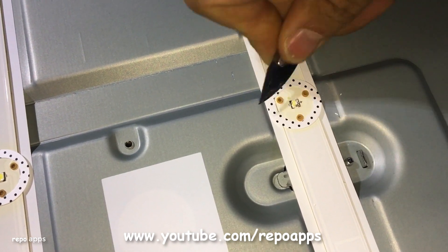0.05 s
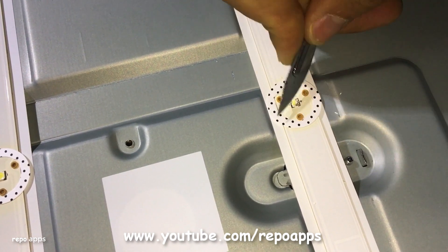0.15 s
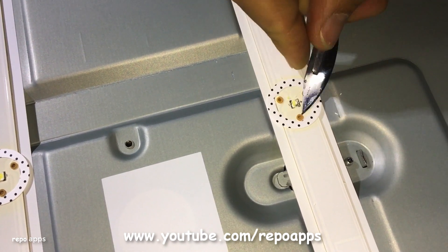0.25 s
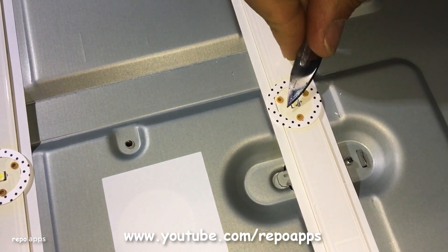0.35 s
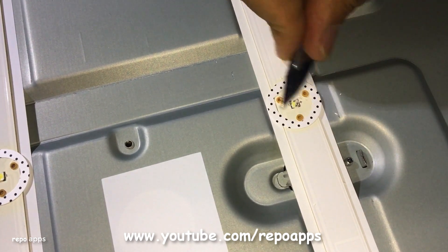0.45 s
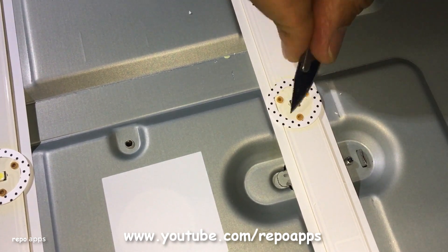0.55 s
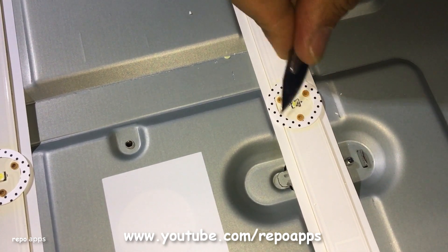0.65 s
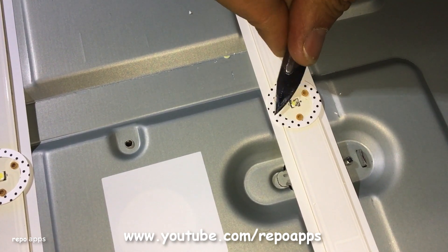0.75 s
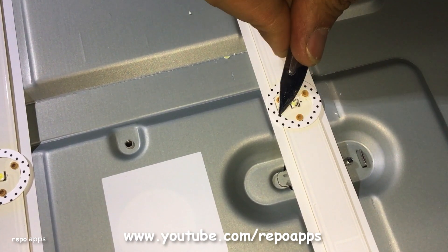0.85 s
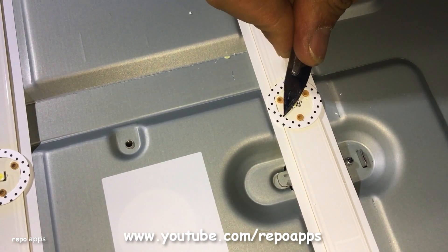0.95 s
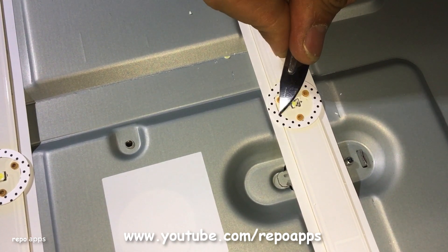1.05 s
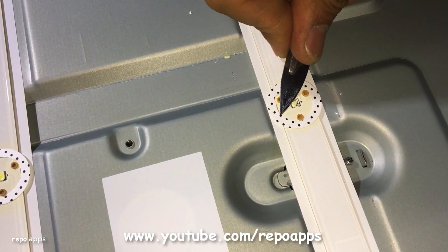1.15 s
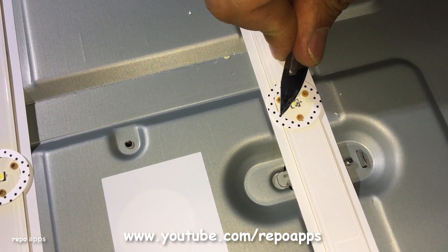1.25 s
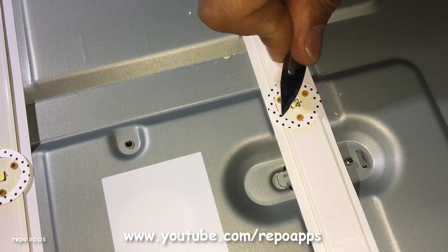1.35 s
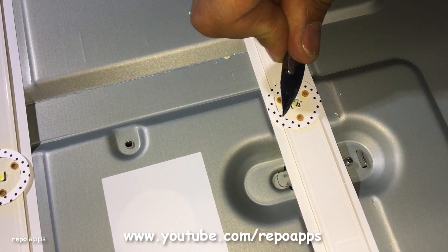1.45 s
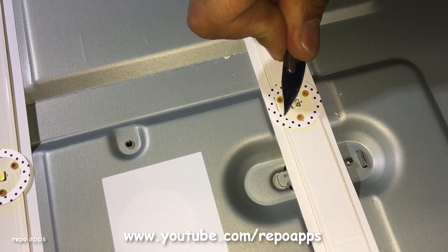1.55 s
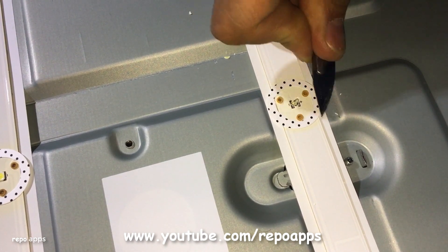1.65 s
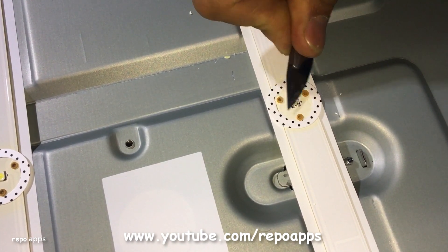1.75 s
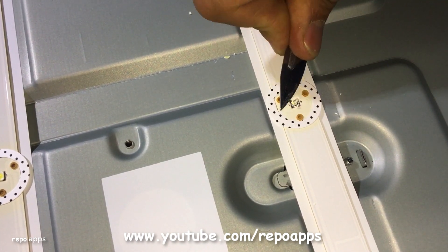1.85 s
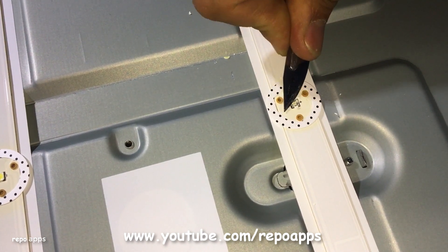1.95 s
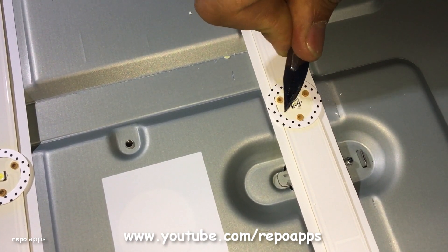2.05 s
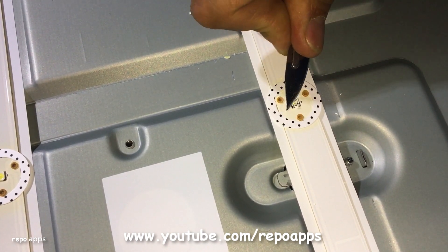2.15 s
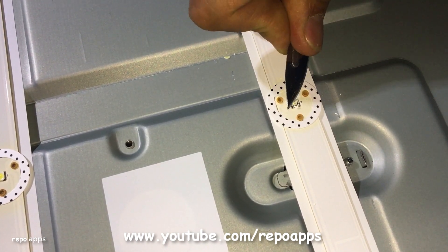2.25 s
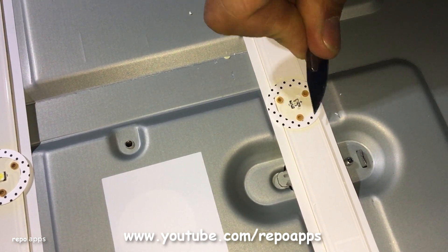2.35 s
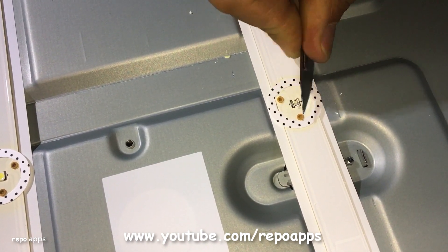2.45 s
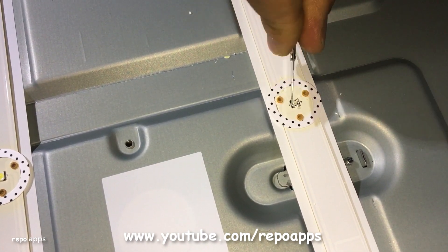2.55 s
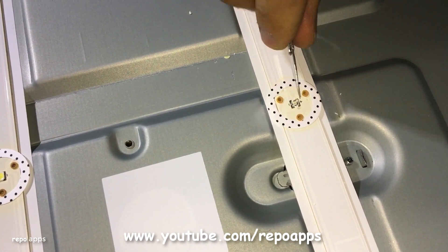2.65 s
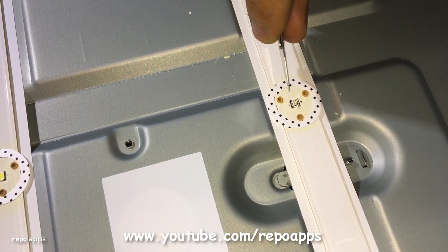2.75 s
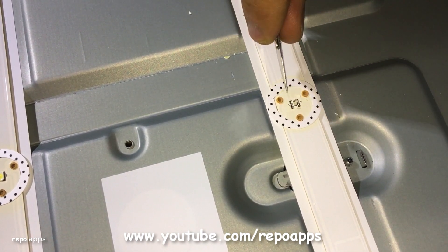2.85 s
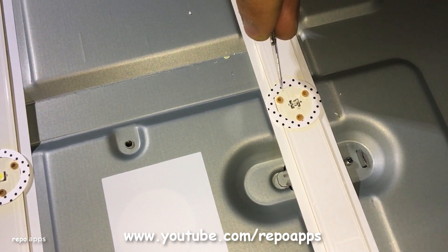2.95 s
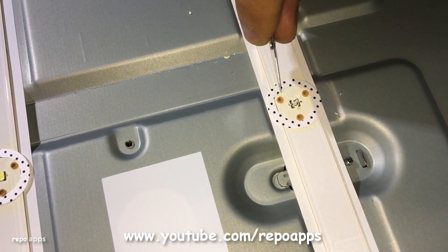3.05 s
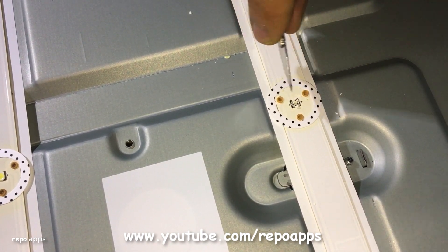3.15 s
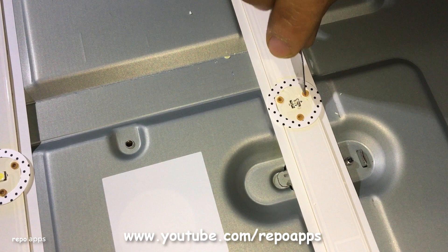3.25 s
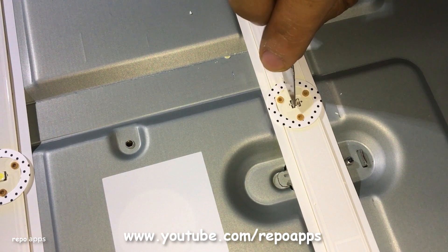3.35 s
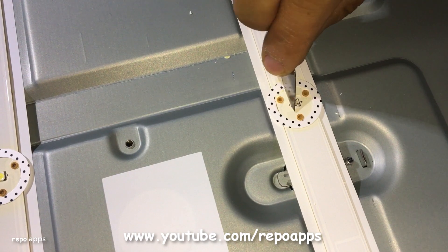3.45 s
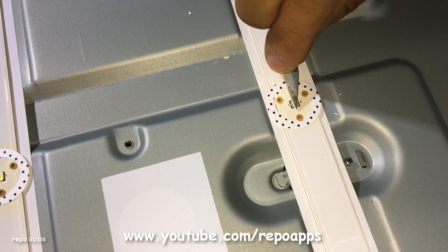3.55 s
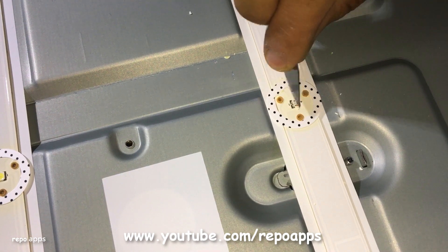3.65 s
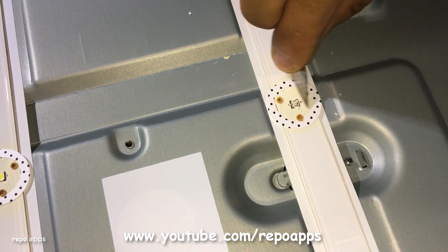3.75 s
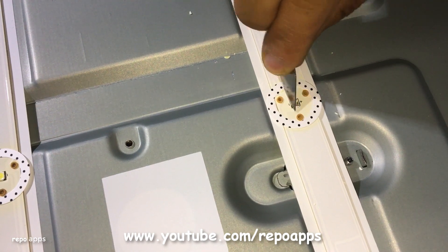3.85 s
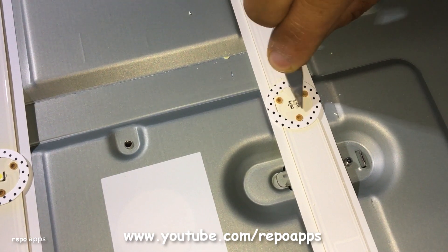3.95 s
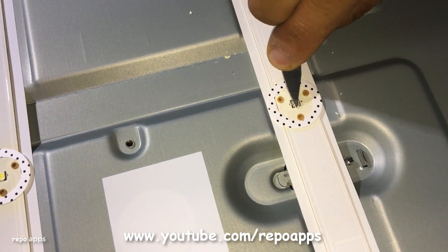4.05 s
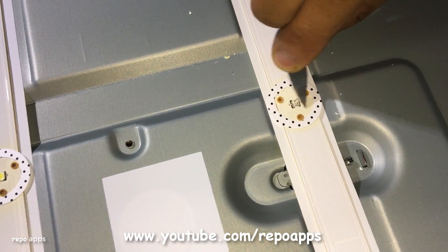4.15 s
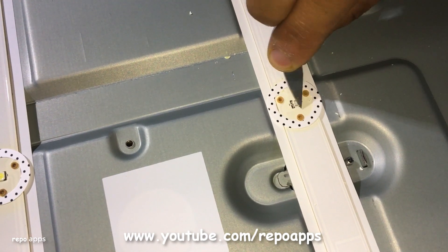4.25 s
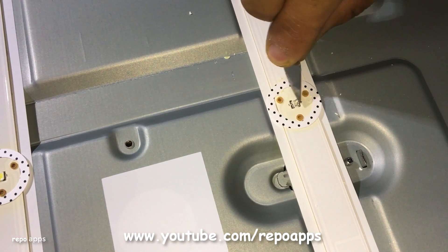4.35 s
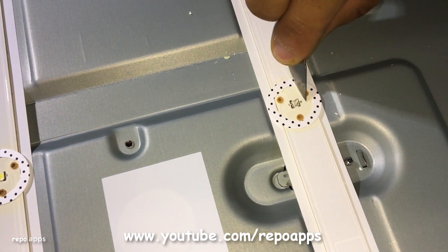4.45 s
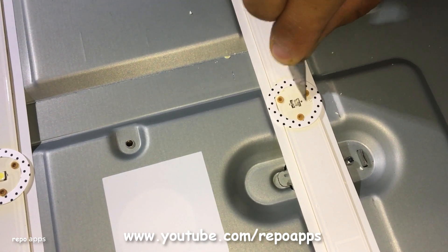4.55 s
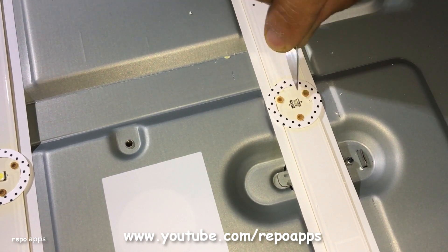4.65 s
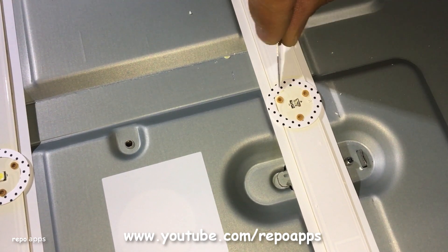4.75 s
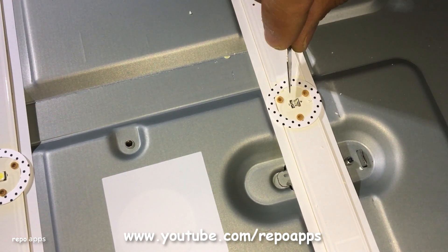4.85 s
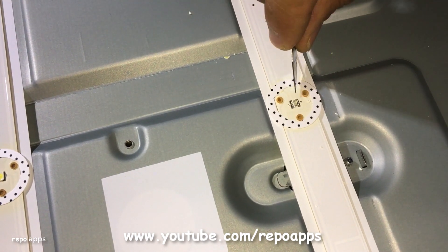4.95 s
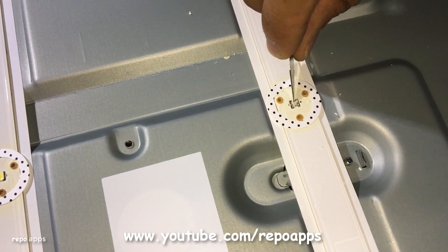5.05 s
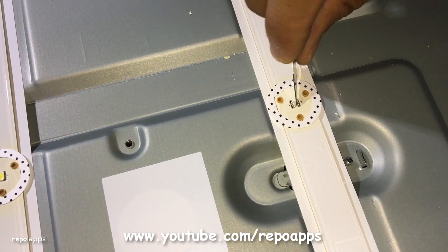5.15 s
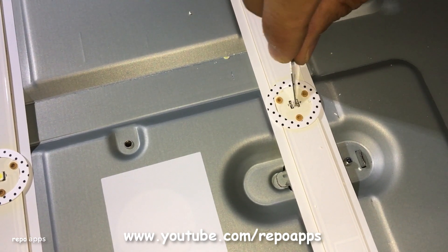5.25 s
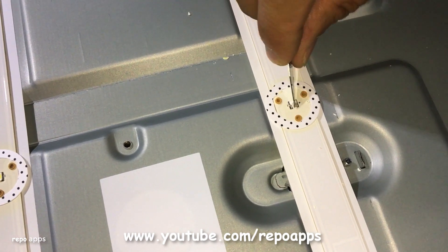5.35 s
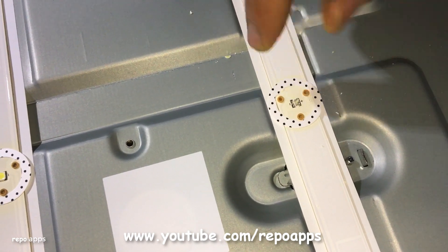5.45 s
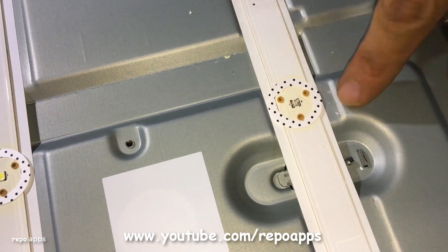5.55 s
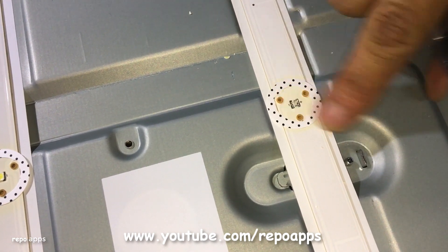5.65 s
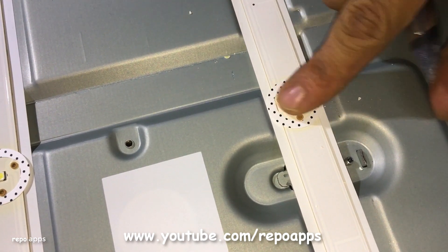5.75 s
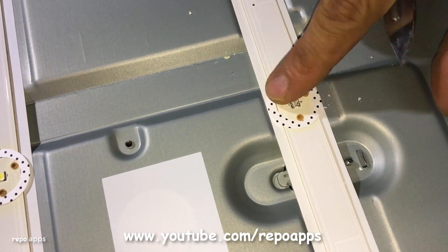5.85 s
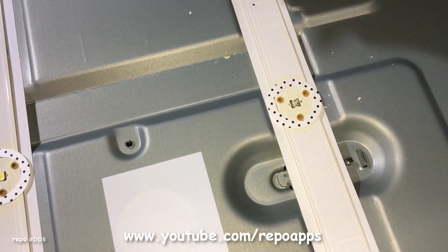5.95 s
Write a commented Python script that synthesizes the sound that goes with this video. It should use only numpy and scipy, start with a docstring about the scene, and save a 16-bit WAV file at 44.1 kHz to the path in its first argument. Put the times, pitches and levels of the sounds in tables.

```python
"""A small room, microphone close to a sheet-metal tray: steel tweezers pry at an LED on a strip fixed in it.
Each touch is a short burst of noisy slips sent through the resonances of tweezers and strip:
the tips tick and ring, the strip crunches, the tray knocks dully underneath and rings on as damped sines.
At the end a fingertip wipes the strip. Behind lie rumble and a faint hiss, shaped noise, the hiss
lifting in six spells; the hand rumbles on the tray, and the tray flexes in low tones."""
import sys
import numpy as np
from scipy import signal
from scipy.fft import rfft, irfft
from scipy.io import wavfile

SR = 44100
rng = np.random.default_rng(int(sys.argv[2]) if len(sys.argv) > 2 else 0)


def store_wav(level_fs):
    """Save 16-bit WAV to argv[1]."""
    pcm = np.round(np.clip(np.atleast_2d(level_fs), -1, 1) * 32767)
    wavfile.write(sys.argv[1], SR, pcm.T.astype(np.int16))


N = 264153
T = np.arange(N) / SR


def gain_of(db):
    """Decibels to amplitude."""
    return 10 ** (np.asarray(db) / 20)


def unit(x):
    """Scales to energy 1."""
    return x / np.sqrt(np.sum(x ** 2) + 1e-30)


def read(points, hz):
    """Joins (f/Hz, value) points on a log-frequency axis."""
    f, value = np.transpose(points)
    return np.interp(np.log(hz + 1), np.log(f + 1), value)


def add(mix, s, sound):
    """Lays a sound into the mix at a time in seconds."""
    part = mix[max(round(s * SR), 0):][:len(sound)]
    part += sound[:len(part)]


def band(x, lo_hz, hi_hz, order=3):
    """Causal band-pass."""
    return signal.sosfilt(signal.butter(order, [lo_hz, hi_hz], "band", fs=SR, output="sos"), x)


def causal(db, size=2048):
    """The most compact causal response (minimum phase) with this gain."""
    log_gain = np.r_[db, db[-2:0:-1]] * np.log(10) / 20
    spectrum = np.exp(np.conj(signal.hilbert(log_gain)))[:len(db)]
    return irfft(spectrum)[:size]


def noise(colour):
    """Steady noise of rms 1; only the shape of the colour counts."""
    shape = gain_of(read(colour, np.fft.rfftfreq(N, 1 / SR)))
    return unit(irfft(rfft(rng.standard_normal(N)) * shape, N)) * np.sqrt(N)


# colour of the steady rumble and hiss behind everything: (f/Hz, relative level/dB per Hz)
FLOOR_COLOUR = [(12, -56), (20, -15.5), (32, -7), (53, -2), (101, -6), (154, -20.5), (301, -28.5),
                (328, -30.5), (802, -30), (873, -29), (2820, -34), (5380, -37.5), (7110, -38.5),
                (13200, -43.5), (16000, -49.5)]


def room_floor(level_db=-65.5):
    """The room at rest: steady noise, strongest in the low rumble."""
    return gain_of(level_db) * noise(FLOOR_COLOUR)


# colour of the lifting hiss: (f/Hz, relative level/dB per Hz)
HISS_COLOUR = [(150, -35), (250, 1.5), (360, -5), (686, -10.5), (1400, -13), (2020, -11.5), (2810, -13.5),
               (3230, -14), (9490, -18.5), (14900, -28), (16000, -25.5)]
# spells in which the hiss lifts: (start t/s, end t/s, rms level/dB)
HISS_LIFTS = [(0.493, 0.748, -63), (1.654, 1.882, -65), (1.953, 2.177, -64), (2.354, 2.579, -64),
              (2.806, 2.947, -69), (3.805, 4.838, -65)]


def hiss_lifts(edge_s=0.0096):
    """Extra hiss, faded in and out of each spell within milliseconds."""
    lift = np.zeros(N)
    for start, end, db in HISS_LIFTS:
        lift += gain_of(db) * np.clip(np.minimum(T - start, end - T) / edge_s + .5, 0, 1)
    return lift * noise(HISS_COLOUR)


# the hand's weight shifts on the tray: (t/s, rumble level/dB before the trim)
HAND_WEIGHT = [(0, -63.5), (.25, -66.5), (.62, -62.5), (.97, -69.5), (1.58, -61), (2.3, -62.5), (3.14, -70),
               (3.65, -61.5), (4.35, -57), (4.62, -58), (5.15, -71.5), (5.4, -69), (5.7, -70), (5.95, -63)]


def hand_rumble(trim_db=-3):
    """The hand resting on the tray: low noise that swells and sinks as its weight shifts."""
    colour = [(20, -19.0), (45, -1), (90, -2.5), (200, -7.5), (450, -15.5), (1200, -31.0), (8000, -68.5)]
    level_db = np.interp(T, *np.transpose(HAND_WEIGHT)) + trim_db
    return gain_of(level_db) * noise(colour)


# the tray flexes under the hand or the tips: (t/s, length/s, first f/Hz, last f/Hz, peak level/dB)
TRAY_BUMPS = [(1.654, 0.045, 342, 342, -36.5), (3.329, 0.1, 128, 64, -48), (3.838, 0.06, 85, 55, -47),
              (3.919, 0.079, 55, 50.6, -43.5), (3.994, 0.067, 52, 58, -45)]


def bumps(swell=0.27):
    """The whole tray flexes for a few cycles: low sines that swell, then sink."""
    out = np.zeros(N)
    for s, length, first_hz, last_hz, db in TRAY_BUMPS:
        u = np.linspace(0, 1, int(length * SR))
        turns = np.cumsum(first_hz * (last_hz / first_hz) ** np.sqrt(u)) / SR
        shape = np.interp(u, [0, swell, 1], [0, 1, 0])
        add(out, s, gain_of(db) * shape * np.sin(2 * np.pi * turns))
    return out


# strength of the echoes: (f/Hz, level against the direct sound/dB)
ECHO_LEVEL = [(80, -6.5), (300, -11), (1000, -7), (3000, -6), (6000, -25.5), (12000, -31.5)]
# how long the echoes last: (f/Hz, t60/s)
ECHO_T60 = [(100, 0.24), (300, 0.18), (1000, 0.08), (3000, 0.077), (6000, 0.13), (13000, 0.17)]


def echoes(first_s=0.0017, size=256):
    """Dense early echoes of a small room as decaying noise: the lows last longest, the high treble is faintest."""
    fade_in = np.clip((T[:SR // 2] - first_s) / first_s, 0, 1)
    hz, t, z = signal.stft(rng.standard_normal(len(fade_in)), SR, nperseg=size)
    t60 = read(ECHO_T60, hz)[:, None]
    decay_db = read(ECHO_LEVEL, hz)[:, None] - 60 * t / t60
    energy_norm = np.sqrt(2 * np.log(1000) / (t60 * SR))  # a long tail gets no extra energy
    z *= gain_of(decay_db) * energy_norm
    return signal.istft(z, SR, nperseg=size)[1][:len(fade_in)] * fade_in


def room(x, count=5, cycle_s=.63):
    """A few random echo patterns blend in rotation, so that touches do not all share one tail."""
    turns = T / cycle_s
    shares = [np.maximum(np.cos(2 * np.pi * (turns - k / count)), 0) ** 2 for k in range(count)]
    shares = shares / np.linalg.norm(shares, axis=0)
    return sum(signal.fftconvolve(x * share, echoes())[:N] for share in shares)


# modes of the tray: (f/Hz, level/dB before the ring trim, t60/s)
TRAY_MODES = [(155, -8, 0.32), (167, -12, 0.3), (385.3, -7.5, 0.055), (389.3, -1.5, 0.096),
              (454.7, -1, 0.066), (672.4, -0.5, .09), (1080, -5.5, 0.028), (1832, -10.5, .08),
              (2396, -19.5, .08), (2690, -12.5, 0.067), (3224, -18, .12)]


def tray(x, ring_db=-6):
    """The sheet metal rings on briefly after each touch, each mode a decaying sine."""
    t = T[:SR // 2]
    ring = np.zeros(len(t))
    for hz, db, t60 in TRAY_MODES:
        norm = 2 * np.log(1000) / (t60 * SR)  # about unit gain at the mode's peak
        ring += gain_of(db) * norm * 1000 ** (-t / t60) * np.sin(2 * np.pi * hz * t)
    return gain_of(ring_db) * signal.fftconvolve(x, ring)[:N]


def slips(rise_ms, decay_ms, grit_db=4.0, clump_db=0.5, snap=0.26, push=3, push_ms=0.27,
          drag=0.048, drag_length=8.1, size=6000):
    """Tiny slips of uneven size crowd up to the moment the tip lets go, then thin out as it drags on."""
    lead = int(2 * rise_ms * SR / 1000)
    ms = (np.arange(size) - lead) * 1000 / SR
    after = np.maximum(ms, 0) / decay_ms
    build_up = np.exp(-(np.minimum(ms, 0) / rise_ms) ** 2 * 0.72)
    force = build_up * (np.exp(-after) + drag * np.exp(-after / drag_length))
    # the tip catches about once a millisecond
    clumps = np.interp(ms, np.linspace(ms[0], ms[-1], num=110), rng.standard_normal(110))
    grit = np.clip(rng.standard_normal(size), -2, 2)
    train = unit(force * rng.standard_normal(size) * gain_of(grit_db * grit + clump_db * clumps))
    train[lead] -= snap / (rise_ms + .5)  # a sudden release is one clean snap
    # one firm shove on the tray carries the low body of a sharp click
    shove = np.exp(-np.abs(ms) / push_ms)
    return lead / SR, train - push / (rise_ms + .5) * shove / shove.sum()


# colour of a bare contact: (f/Hz, level/dB)
CONTACT_COLOUR = [(25, -13.5), (60, -2), (100, -4), (170, 0), (250, 1.5), (370, 2.5), (520, 3), (750, -5.5),
                  (1000, -8.5), (1300, -6.5), (3000, -11.5), (6000, -11.5), (10000, -10.5), (13000, -15.5),
                  (15000, -22), (17000, -26)]


def tweezers(grip, notes_hz, grip_db=7, damping=1.15, notes_db=(4, 6), notes_q=(18, 20), size=8192):
    """Response to one slip: a broad tick, the grip's resonances, and two notes set by where the tips bear."""
    hz = np.fft.rfftfreq(size, 1 / SR)
    modes = [(f, width * damping, db + grip_db) for f, width, db in grip]
    modes += [(f, f / q, db) for f, q, db in zip(notes_hz, notes_q, notes_db)]
    power = 1 + sum(gain_of(db) ** 2 / (1 + (2 * (hz - f) / width) ** 2) for f, width, db in modes)
    return causal(read(CONTACT_COLOUR, hz) + 10 * np.log10(power))


# resonances of tweezers and strip in four grips: (f/Hz, width/Hz before damping, level/dB before the grip level)
GRIP_PROBING = [(1560, 160, -7), (3230, 210, 3), (4560, 460, 0.5), (5150, 470, 2.5), (6160, 220, 0),
                (9180, 350, 9.5), (11700, 300, -3), (13900, 1400, 5.5)]
GRIP_PRYING = [(1500, 200, -6), (3150, 200, -6), (3830, 150, -7), (5950, 600, -2), (6980, 370, -5),
               (9650, 400, 2), (11600, 450, -1), (13500, 300, -7)]
GRIP_SCRAPING = [(2390, 59, 6.5), (2843, 150, 7), (3460, 233, 9), (3690, 97, 5.5), (5230, 340, -6.5),
                 (7100, 71, -31), (8430, 260, 5), (9430, 330, -3), (10240, 118, -19.5), (11540, 200, -22),
                 (12400, 140, -20)]
GRIP_BRUSHING = [(1760, 42, 0.5), (3500, 150, 5), (5260, 320, -7.5), (6380, 100, 1.5), (8300, 220, -2),
                 (9060, 260, 6.5), (11800, 350, -0.5), (13800, 360, 2)]
# when each grip is taken up: (t/s, its resonances)
GRIPS = [(0, GRIP_PROBING), (1.6, GRIP_PRYING), (3.3, GRIP_SCRAPING), (5.05, GRIP_BRUSHING)]


def grip_at(s):
    """The resonances change with the grip; the latest one taken up holds."""
    return [modes for start, modes in GRIPS if start <= s][-1]


# six parts of a touch, thud, tray, knock, strip, tip, edge: (low f/Hz, high f/Hz)
PART_BANDS = [(30, 250), (250, 600), (600, 1400), (1400, 4400), (4400, 8500), (8500, 16500)]
# how far each of the six parts follows weight, stiffness of the spot and brightness: (dB per dB)
BY_WEIGHT = np.array([1, 1, 1, 0, 0, 0])
BY_STIFFNESS = np.array([-1, 0, 1, 0, 0, 0])
BY_BRIGHTNESS = np.array([0, 0, 0, -1, 0, 1])


def touch(s, rise_ms, decay_ms, blow_db, balance_db, notes_hz, margin_s=.002):
    """One burst of slips: weight feeds the tray, a stiff spot knocks instead of thudding, brightness favours the edge."""
    strength_db, weight_db, stiff_db, bright_db = blow_db
    lead_s, train = slips(rise_ms, decay_ms)
    burst = signal.fftconvolve(train, tweezers(grip_at(s), notes_hz))
    parts_db = strength_db + np.array(balance_db)
    parts_db = parts_db + weight_db * BY_WEIGHT + stiff_db * BY_STIFFNESS + bright_db * BY_BRIGHTNESS
    sound = np.zeros(len(burst))
    for db, (lo, hi) in zip(parts_db, PART_BANDS):
        lag_s = 1 / (np.pi * (hi - lo))  # all parts start together, however narrow their band
        part = unit(band(burst, lo, hi)) * np.sqrt(SR / 100)  # level as if spread over 10 ms
        add(sound, margin_s - lag_s, gain_of(db) * part)
    return s - lead_s - margin_s, sound


# notes of strip and tips where a row gives none
STRIP_HZ, SCRAPE_TIP_HZ, SOFT_TIP_HZ = 3600, 9400, 5326

# the fingertip on the strip: (t/s, decay/ms, strength level/dB, weight on the tray/dB)
WIPES = [(5.596, 15.5, -57.5, 3.5), (5.707, 7, -65, 6), (5.724, 8.6, -54, -3.5), (5.82, 8.3, -62, 3.5),
         (5.841, 7.1, -57.5, 4.5), (5.944, 10, -62.5, 3.5), (5.973, 5.9, -64.5, -10)]
# balance of a wipe: (thud, tray, knock, strip, tip, edge level/dB)
WIPE_BALANCE = (3, 3.5, -4.5, -1, 5.5, 3.5)


def wipes(rise_ms=3.5):
    """The fingertip wipes the strip: bursts of slips that build up slowly."""
    out = np.zeros(N)
    for s, decay_ms, db, weight_db in WIPES:
        blow_db = (db, weight_db, 0, 0)
        add(out, *touch(s, rise_ms, decay_ms, blow_db, WIPE_BALANCE, (STRIP_HZ, SOFT_TIP_HZ)))
    return out


# soft contacts: (t/s, decay/ms, strength level/dB, weight on the tray/dB, stiffness of the spot/dB, strip note f/Hz)
TAPS = [(.055, 9.6, -70, 8.5, -4, 3270), (0.073, 4.4, -72.5, 3.5, 15, 1250), (.351, 14, -74, 15.5, 2, 720),
        (1.323, 4.6, -90, 22.5, 1, 695), (1.359, 6.6, -87, 19, -11.5, 2350),
        (1.455, 1.1, -70.5, 11, -4, 4220), (1.887, 2, -81.5, 19.5, 7, 1040),
        (1.921, 4.4, -68, 8.5, -3, 2420), (2.253, 4.1, -72.5, 8, -7, 3260),
        (2.267, 2.8, -66, 12.5, -6.5, 1560), (2.285, 4.1, -66, 9.5, -3, 3300),
        (2.311, 6, -67, 7.5, -8, 3040), (2.363, 1.6, -61, -2, 4, 3100), (2.65, 13, -69, 7, 0.5, 2570),
        (2.74, 19, -64, 5.5, -2.5, 3210), (2.825, 2.6, -67.5, -15, 2.5, 3580),
        (3.346, 14, -74, 9, -6, 3400), (3.386, 10.5, -75, 9, 0, 2440), (3.475, 5.5, -68.5, 9.5, -5, 3800),
        (4.587, 23, -66, 9, -2, 2490), (4.836, 13, -75, 23, -1, 685), (4.984, 6.3, -82.5, 27, 0, 522),
        (5.489, 5.3, -71, 16.5, 1.5, 1470)]
# balance of a tap: (thud, tray, knock, strip, tip, edge level/dB)
TAP_BALANCE = (-0.5, 4.5, -1.5, 6, 3.5, -3)


def taps(rise_ms=1.4):
    """Soft, dull contacts, most of them leaning on the tray."""
    out = np.zeros(N)
    for s, decay_ms, db, weight_db, stiff_db, strip_hz in TAPS:
        blow_db = (db, weight_db, stiff_db, 0)
        add(out, *touch(s, rise_ms, decay_ms, blow_db, TAP_BALANCE, (strip_hz, SOFT_TIP_HZ)))
    return out


# drags over the strip: (t/s, rise/ms, decay/ms, strength level/dB, weight on the tray/dB,
# stiffness of the spot/dB, brightness/dB, strip note f/Hz)
SCRAPES = [(.397, 5.6, 1.5, -63, -6, 3.5, -3.5, 4200), (0.524, 6.4, 9.2, -52.5, -1, -2.5, 2.5, 3800),
           (1.664, 1.86, 17, -50, 2, -5, 1.5, 2510), (1.676, 4.7, 7.4, -51, 11, 0.5, -7, 2380),
           (1.958, 2.84, 14, -63.5, 12, 3.5, -10.5, 1410), (3.554, 3.73, 12, -51, 11, -0.5, -2, 2320),
           (3.644, 1.6, 8.6, -53.5, -2.5, -13, -5.5, 2380), (3.76, 5.9, 7.4, -56.5, 8, -3, -0.5, 3250),
           (3.776, 2.5, 3.7, -52, 5, -3, 4, 3800), (3.944, 1.93, 2.8, -52, 8.5, -5, 2.5, 1780),
           (3.978, 1.42, 5.4, -41.5, 5.5, -1, -2.5, 1550), (3.9862, 1.2, 2.7, -33, -8.5, -3, 0.5, 2620),
           (4.135, 1.6, 3.2, -44.5, -4.5, 1.5, 1.5, 3570), (4.2213, 2.4, 12.3, -40, -16, -2, 2.5, 3900),
           (4.228, 1.78, 5.5, -44, 2, -0.5, -6.5, 3900), (4.344, 2.15, 4, -56.5, 5.5, 1.5, -5, 3640),
           (4.36, 2.07, 6.4, -42, -7, -5, -8.5, 2280), (4.487, 0.97, 1.4, -26.5, -14.5, -8.5, 3.5, 3650),
           (4.618, 2.4, 11, -43, -15, 1, 3.5, 3630), (4.622, 2.4, 8.1, -40.5, -1, -4, -4.5, 3360),
           (5.12, 1.93, 4.8, -57.5, 3.5, 1.5, -4, 3600), (5.136, 3.3, 2.7, -69.5, 19, 1.5, 5, 1770),
           (5.1386, .7, 1.5, -44, -11, -5.5, 0.5, 1700), (5.238, 1.5, 5.2, -48, 1, -7, 0.5, 1800),
           (5.248, 2.3, 10.3, -52, 4.5, -6.5, -2, 1740), (5.43, 1.9, 4, -40.5, -4, -8, 3.5, 3640),
           (5.514, 6.6, 1.6, -51.5, -13, 0, 8.5, 3270), (5.735, 1.93, 2, -46, -6.5, -7.5, 2, 4130)]
# balance of a scrape: (thud, tray, knock, strip, tip, edge level/dB)
SCRAPE_BALANCE = (-1.8, 2.6, -2.2, -0.92, 2.83, 1)


def scrapes():
    """The tips drag over the strip: each burst has its own build-up and strip note."""
    out = np.zeros(N)
    for s, rise_ms, decay_ms, *blow_db, strip_hz in SCRAPES:
        add(out, *touch(s, rise_ms, decay_ms, blow_db, SCRAPE_BALANCE, (strip_hz, SCRAPE_TIP_HZ)))
    return out


# snaps off an edge: (t/s, decay/ms, strength level/dB, weight on the tray/dB,
# stiffness of the spot/dB, brightness/dB, tip note f/Hz)
CLICKS = [(.505, 3.3, -58.5, -7, -1, 4, 9400), (0.5265, 1.7, -41, -14.5, -1, 3, 4700),
          (0.53, 1.9, -44.5, -7, -3, 3, 12450), (0.6327, 4.3, -51, -5.5, -3, 3, 12530),
          (.6634, 1.7, -40, -8.5, -1.5, 4, 5100), (.911, 1, -70.5, -0.5, -6, 6.5, 5400),
          (1.086, 3.3, -70.5, 3, -0.5, -1, 4670), (1.508, 3.4, -58, 2.5, -5, 4, 12440),
          (1.531, 3.1, -47.5, -6.5, 2, 6, 9300), (1.682, 7.2, -51, 2.5, -10.5, 2, 5240),
          (1.964, 2.6, -56.5, 3, -3.5, 9, 11500), (2.0824, 3.9, -54.5, 2, 0, 1, 12700),
          (2.195, 7.4, -66, -1, -5.5, 0.5, 6830), (2.375, .72, -28, -6, 1, 8, 12300),
          (3.6351, 2.2, -38, 0, 2, 1.5, 5160), (3.6644, 4.1, -51.5, 0, -4.5, 1.5, 8800),
          (3.807, 2.5, -31, -5, 7.5, 2.5, 7000), (3.8106, 4, -34.5, -3, -5.5, 2, 7200),
          (3.823, 7.4, -43.5, -9, 1, -1, 5360), (3.926, 1.8, -47, -2.5, 4, 3, 6900),
          (4.0736, 10, -51.5, -1.5, 3, 1.5, 9910), (4.097, 2.1, -38.5, -7.5, 1.5, 5, 13300),
          (4.1293, 3.2, -42.5, -4, -2.5, 5, 10000), (4.1906, 2.9, -47.5, -3, -6.5, 2.5, 7540),
          (4.332, 5.9, -50.5, -3.5, -1.5, 1.5, 9880), (4.3529, 2.6, -39.5, -10, -1, 8, 9800),
          (4.457, 5.1, -52, -1, 1, 4.5, 9670), (4.4834, 1.3, -39.5, -2.5, 5.5, 2, 9800),
          (4.493, 3.7, -29, -7.5, -4.5, 1.5, 10100), (4.7794, 0.73, -65, -5, 3, 1.5, 6820),
          (5.222, 2.6, -48, 4.5, -1, 1, 5070), (5.323, 2.4, -46.5, 3.5, -0.5, 5, 8800),
          (5.369, 1.7, -46, 1, -2, 1, 5900), (5.408, 3, -52, 6.5, -5, 1.5, 9550),
          (5.851, 4.3, -55, -20, -5.5, 2, 8140), (5.924, 3.9, -62.5, 4.5, -3.5, 7, 6300)]
# balance of a click: (thud, tray, knock, strip, tip, edge level/dB)
CLICK_BALANCE = (-1.5, 3.36, -0.04, -0.5, 4.5, -0.5)


def clicks(rise_ms=.5):
    """The tips snap off an edge: an abrupt burst of slips, each with its own tip note."""
    out = np.zeros(N)
    for s, decay_ms, *blow_db, tip_hz in CLICKS:
        add(out, *touch(s, rise_ms, decay_ms, blow_db, CLICK_BALANCE, (STRIP_HZ, tip_hz)))
    return out


def scene(direct_db=-0.44):
    """The background and the tray's bumps, then the touches with the tray's ring and the room."""
    background = room_floor() + hiss_lifts() + hand_rumble()
    near = gain_of(direct_db) * (wipes() + taps() + scrapes() + clicks())
    near = near + tray(near)
    return (background + bumps() + near + room(near))[None]


def record(dry):
    """The microphone channel's band limit: a steep low-pass at 15950 Hz."""
    lowpass = signal.firwin(301, 15950, window=("kaiser", 8), fs=SR)
    return signal.oaconvolve(dry, lowpass[None], "same")


dry = scene()
out = record(dry)
store_wav(out)
```